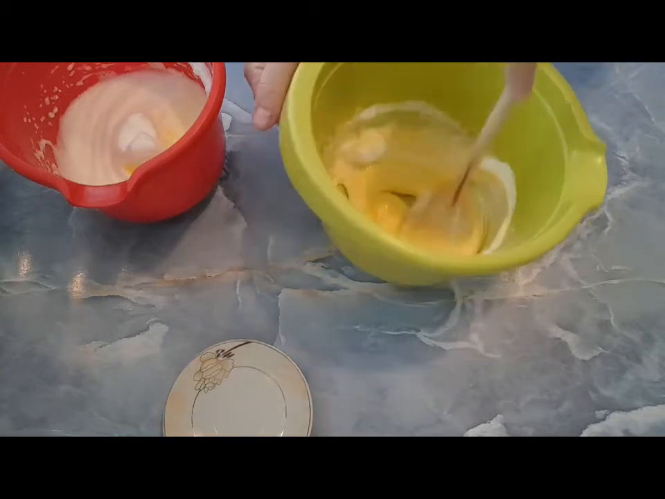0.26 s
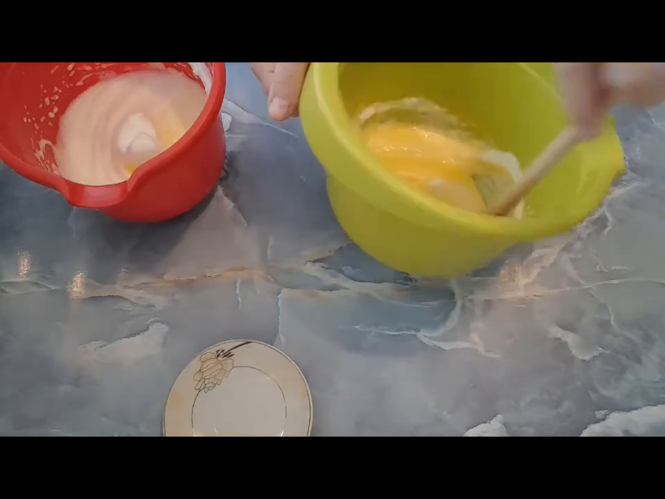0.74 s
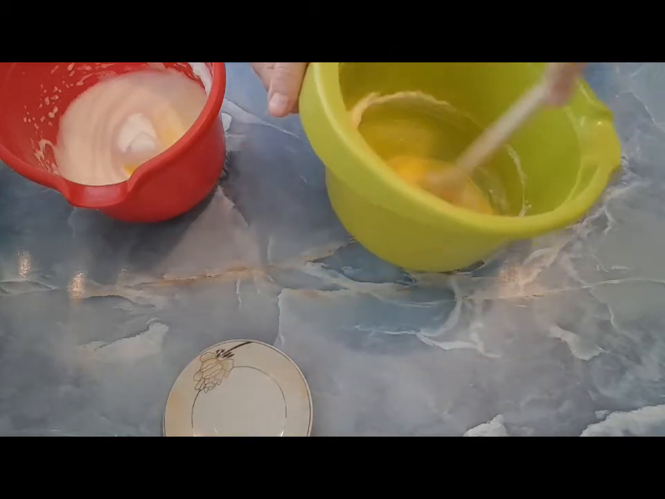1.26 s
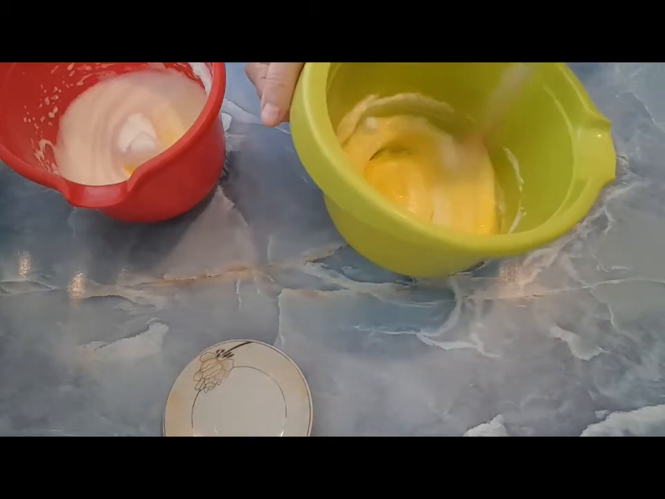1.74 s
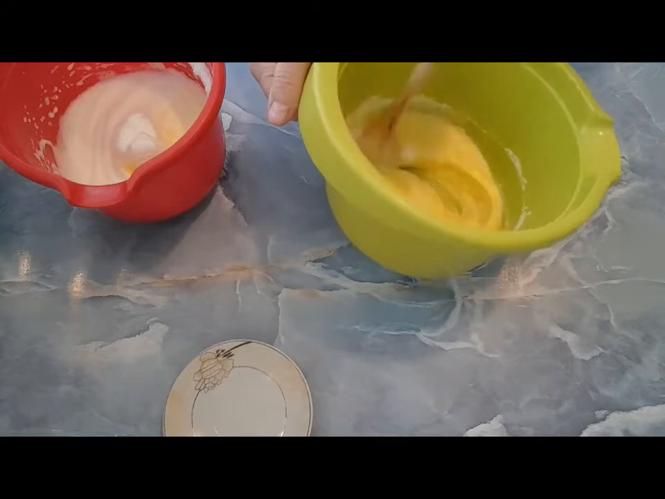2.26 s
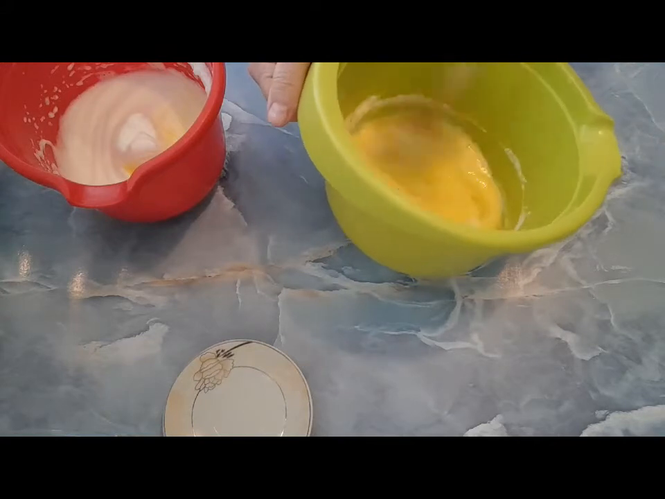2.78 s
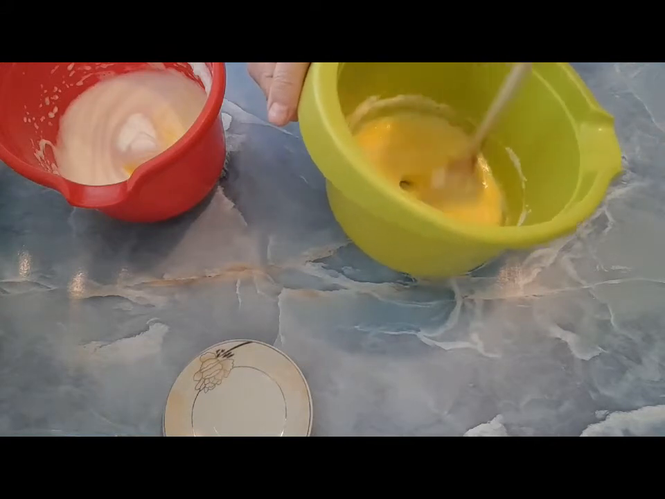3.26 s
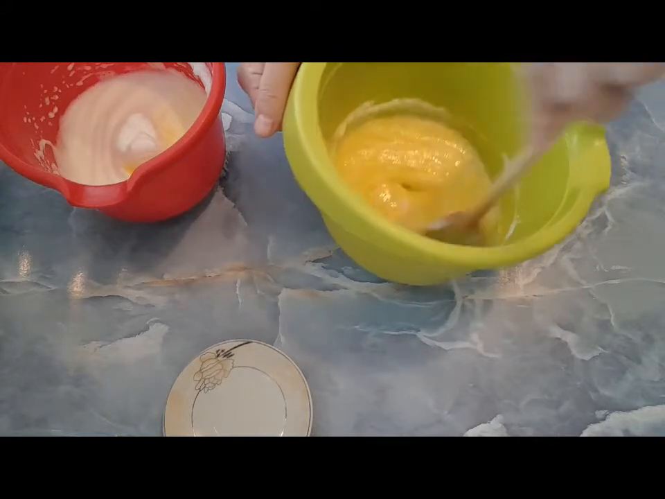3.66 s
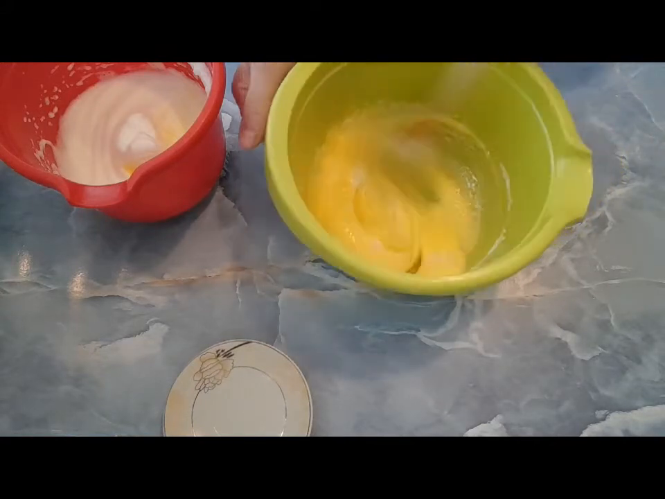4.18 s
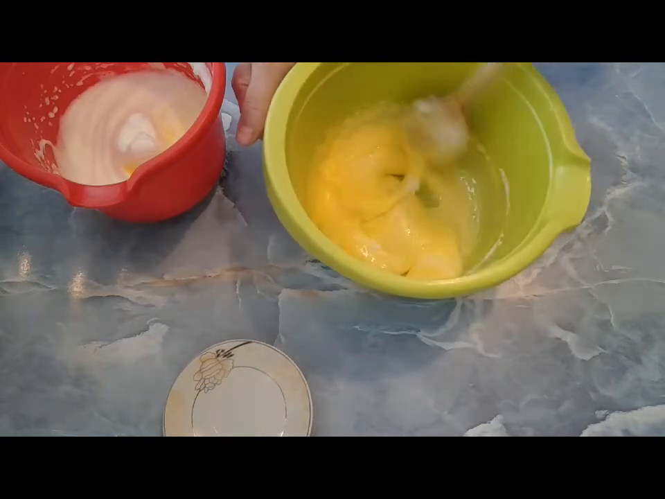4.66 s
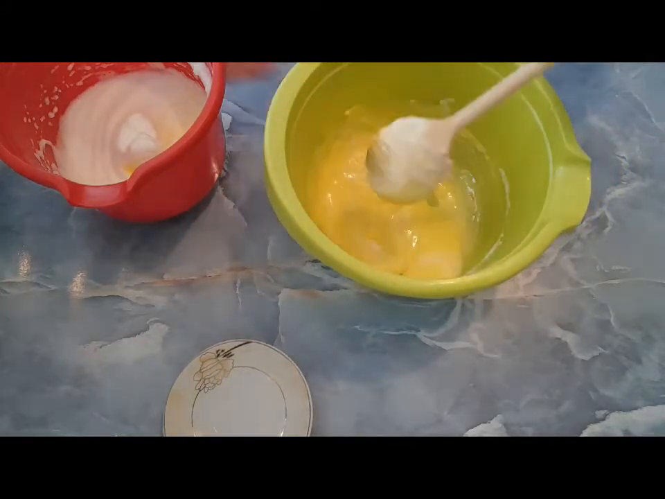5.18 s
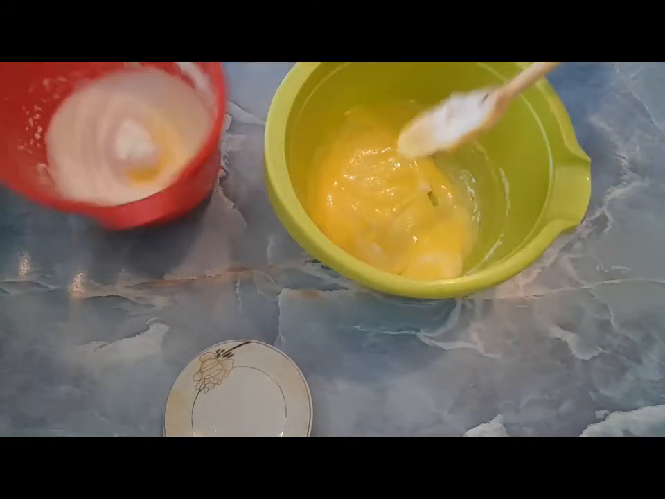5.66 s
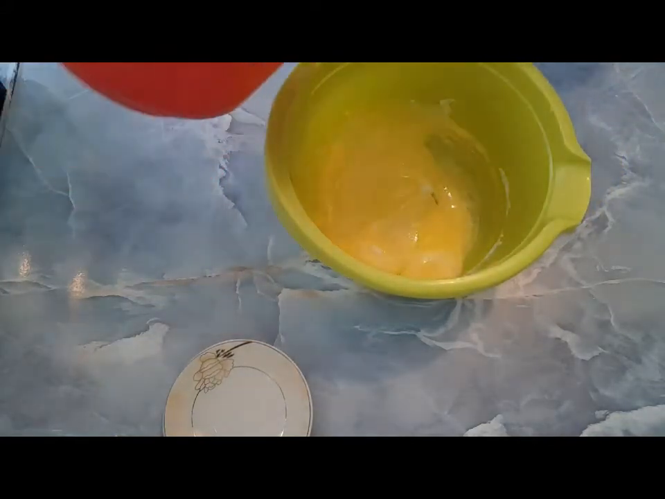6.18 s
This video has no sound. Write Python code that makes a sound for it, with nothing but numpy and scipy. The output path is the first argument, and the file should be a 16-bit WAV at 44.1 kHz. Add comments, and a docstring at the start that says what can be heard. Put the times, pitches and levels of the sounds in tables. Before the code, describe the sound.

From the very start to about 4.3 s, a wooden spoon briskly stirs thick yolk and sugar in a plastic bowl, close to a stereo microphone in a fairly dry kitchen. Strokes come quickly and unevenly, several per second: gritty, fizzy scrapes, small wet smacks and sharp woody ticks on the wall, with hollow plastic knocks ringing briefly in the low mids. The table beneath adds soft booms. Knocks grow somewhat stronger between 2 and 3.3 s, with a prominent one near 3.2 s. Stirring halts at about 4.3 s. A faint rustle follows, then light spoon touches from 4.65 to 4.85 s and a slight shift on the table. Around 5.4 s a dull, heavier thud sounds as a bowl moves, with a weaker bump at 5.6 s. Barely audible rustles remain in near silence until one last light tap at 6.3 s.

```python
"""At a kitchen table, a small stereo microphone stands close by in faint room hush.
First a wooden spoon stirs thick yolk and sugar round a plastic bowl: slips of noise scrape, bursts tick on the
wall, damped sines ring the bowl hollow near 550 Hz and boom the table top. After 4.3 s the stirring stops:
soft noise puffs rustle and quiet touches follow; from 4.9 to 5.7 s bowl and jug shift with thuds on the table.
A last light tap comes at 6.3 s. An expander sinks the quiet gaps."""
import sys
import numpy as np
from scipy import signal
from scipy.fft import rfft, irfft, next_fast_len
from scipy.io import wavfile
from scipy.ndimage import uniform_filter1d

SR = 44100
rng = np.random.default_rng(int(sys.argv[2]) if len(sys.argv) > 2 else 0)


def pcm_store(signal):
    """Save signal as 16-bit PCM."""
    levels = np.round(np.clip(np.atleast_2d(signal), -1, 1) * 32767)
    wavfile.write(sys.argv[1], SR, levels.astype(np.int16).T)


N = 283563
T = np.arange(N) / SR
CREST_DB = 9  # nominal peak of a tick or rustle over its rms


def gain_of(db):
    """Decibels to amplitude."""
    return 10 ** (np.asarray(db) / 20)


def evened(x):
    """Scales to rms 1."""
    return x / np.sqrt(np.mean(x ** 2) + 1e-20)


def colour(x, points, share=1):
    """Filters by a (f/Hz, level/dB) spectrum, or by a share of its decibels."""
    size = next_fast_len(N + SR // 4)
    hz, db = np.transpose(points)
    shape_db = np.interp(np.log(np.fft.rfftfreq(size, 1 / SR) + 1), np.log(hz + 1), db)
    return irfft(rfft(x, size) * gain_of(share * shape_db), size)[..., :N]


def toned(x, noise, points):
    """Colours x, scaled so that the given noise would come out at rms 1."""
    return colour(x, points) / np.std(colour(noise, points))


def wander(per_s):
    """Slow chance drift between -1.6 and 1.6, with so many turning points a second."""
    knots = np.clip(rng.standard_normal(400), -1.6, 1.6)
    return np.interp(T * per_s, np.arange(400), knots)


def grit(per_s, spread_db):
    """Slips of spoon and sugar grains: clicks of uneven size and random sign, scaled to rms 1."""
    size_db = spread_db * np.minimum(rng.exponential(1, N), 5)
    clicks = gain_of(size_db) * rng.choice([-1., 1.], N)
    return evened(clicks * (rng.random(N) < per_s / SR))


def ringing(modes, rise_cycles):
    """One dying sine for every mode, as rows; a soft contact lets it swell over the first cycles."""
    t = T[:SR // 2]
    rings = []
    for hz, db, t60 in modes:
        swell = 1 - np.exp(-t * hz / rise_cycles)
        rings.append(gain_of(db - 60 * t / t60) * np.sin(2 * np.pi * hz * t) * swell)
    return np.array(rings)


def flares(seconds, peaks_db, t60, rise_s):
    """Power envelope of quick rises and dying tails."""
    power = np.zeros(N)
    for s, db in zip(seconds, peaks_db):
        part = power[round(s * SR):][:SR // 2]
        t = T[:len(part)]
        part += (gain_of(db - 60 * t / t60) * np.minimum(t / rise_s, 1)) ** 2
    return power


def stroked(rows, levels_db, lift_db_per_s, rest_db):
    """Level in dB of all strokes together: each bites, eases off while it lasts, then lifts."""
    bite_db_per_s, ease_db_per_s = 599.5, 8.5
    power = np.full(N, gain_of(rest_db) ** 2)
    for (start, length, *_), db in zip(rows, levels_db):
        t = T - start
        bite = bite_db_per_s * np.maximum(-t, 0)
        ease = ease_db_per_s * np.clip(t, 0, length)
        lift = lift_db_per_s * np.maximum(t - length, 0)
        power += gain_of(np.maximum(db - bite - ease - lift, -150)) ** 2
    return 10 * np.log10(power)


def lumpy(x, patchy_db):
    """Time-frequency patches drift in level, alike in every row of x."""
    z = signal.stft(x, nperseg=256, noverlap=192)[2]
    patches = uniform_filter1d(rng.standard_normal(z.shape[1:]), 3, 0)
    patches = evened(uniform_filter1d(patches, 14, 1))
    return signal.istft(z * gain_of(patchy_db * patches), nperseg=256, noverlap=192)[1][:, :N]


def body(modes, rub, blows, held_s, rings_on):
    """Rubbing drives every mode unevenly as the spoon travels; each blow strikes another spot, soon damped."""
    rings = ringing(modes, 1.1)
    rings = rings * (-1.) ** np.arange(len(modes))[:, None]  # neighbouring modes push opposite ways
    pivot_hz = modes[len(modes) // 3][0]
    octaves = np.minimum(np.log2(np.array(modes)[:, 0] / pivot_hz), .5)
    spots_db = 1.7 * rng.standard_normal((len(blows), len(modes))) + np.outer(blows[:, 2], octaves)
    # what struck stays in touch: most of the ring dies early, a share rings on
    struck = gain_of(spots_db) @ rings * (rings_on + np.exp(-T[:SR // 2] / held_s))
    out = np.zeros(N + SR)
    for (s, db, _), ring in zip(blows, struck):
        out[round(s * SR):][:len(ring)] += gain_of(db) * ring / abs(ring).max()
    drive = grit(450, 2.8) * rub / np.linalg.norm(rings)
    for ring in rings:
        out[:N] += signal.oaconvolve(drive * gain_of(3.2 * wander(18)), ring)[:N]
    return out[:N]


def reflections(x, t60, count):
    """A short spray of dying echoes, together of energy 1, lasting count samples."""
    tail = rng.standard_normal(count) * gain_of(-60 * T[:count] / t60)
    return signal.oaconvolve(x, tail / np.linalg.norm(tail))[:N]


# spectrum of the room hush: [f/Hz, density/dB per Hz, relative]
HUSH_SPECTRUM = [(40, -24.5), (161, -7), (252, -18.5), (616, -25), (1250, -33), (6500, -27.5),
                 (8400, -39.5), (9800, -23.5), (13500, -31.5), (15200, -42)]


def room_hush():
    """Steady coloured noise, independent on left and right."""
    return gain_of(-67.5) * evened(colour(rng.standard_normal((2, N)), HUSH_SPECTRUM))


# strokes of the spoon along the wall: [start t/s, length t/s, scrape level/dB,
# fizz level relative to scrape/dB, bowl ring level/dB]
SPOON_STROKES = [(0, 0.093, -49.5, 10, -39.5), (0.106, 0.091, -38, -0.5, -37.5),
                 (0.246, 0.078, -44, -1.5, -39), (0.319, 0.15, -43, 3, -30.5), (0.558, 0.083, -39, -4, -41),
                 (0.696, 0.3, -55, 2, -68), (0.826, 0.061, -48.5, -3, -49.5), (0.928, 0.092, -37, -1, -29),
                 (1.007, 0.071, -42.5, 9, -31.5), (1.114, 0.19, -42, -2.5, -39.5),
                 (1.334, 0.049, -49, 0.5, -41), (1.394, 0.039, -31, -6.5, -25.5),
                 (1.477, 0.23, -40.5, 0.5, -32), (1.757, 0.1, -42.5, 3, -40), (1.9, 0.099, -39, 3, -33.5),
                 (2.052, 0.11, -39, -1, -33), (2.165, 0.19, -39, 0.5, -33), (2.434, 0.18, -45.5, 2, -34.5),
                 (2.564, 0.27, -44, -7.5, -39), (2.723, 0.063, -47, 6.5, -35),
                 (2.838, 0.069, -37.5, -3, -37.5), (2.971, 0.22, -45, 2, -39), (3.241, 0.062, -43, -1, -28),
                 (3.385, 0.11, -53.5, 5, -32.5), (3.538, 0.11, -41.5, 4, -40),
                 (3.677, 0.11, -48.5, 4.5, -51), (3.799, 0.1, -41, 4, -29), (3.935, 0.21, -39.5, -1, -34.5),
                 (4.663, 0.072, -77, 10.5, -60), (4.794, 0.045, -51, 6.5, -52),
                 (4.899, 0.066, -67.5, 6.5, -63), (5.351, 0.16, -78, 11, -67),
                 (6.347, 0.055, -55.5, -7.5, -51.5)]


def stroke_levels():
    """Scrape, fizz and bowl levels in dB, all following the same strokes."""
    scrape, fizz, press = np.transpose(SPOON_STROKES)[2:]
    return [stroked(SPOON_STROKES, db, 350.5, -110) for db in (scrape, scrape + fizz, press)]


# sharp ticks of the spoon on the wall: [t/s, level/dB, fizz level relative to tick/dB, pitch f/Hz]
SPOON_TICKS = [(0.152, -14, -14, 2780), (0.170, -26.5, -16.5, 1620), (0.296, -25, -4.5, 1490),
               (0.338, -14.5, -15, 1490), (0.377, -15.5, -21.5, 2020), (0.4356, -18.5, -8, 2590),
               (0.4757, -23, -4.5, 1610), (0.538, -32, 0.5, 1490), (0.633, -20, -14, 1430),
               (0.847, -22.5, -24.5, 1530), (0.942, -16.5, -26.5, 1500), (1.022, -17, -8.5, 2200),
               (1.050, -21, 0.5, 4460), (1.288, -18.5, -24.5, 1470), (1.3806, -20, -25, 1460),
               (1.436, -11.5, -26, 2520), (1.482, -14.5, -21, 2530), (1.539, -22, -7, 2700),
               (1.796, -16, -27, 1770), (1.871, -18, -5, 2780), (2.0726, -16.5, -11, 2100),
               (2.1094, -16, -12, 1490), (2.200, -15, -10.5, 2640), (2.287, -12, -31.5, 2050),
               (2.424, -18, -31, 1670), (2.744, -17, -29.5, 1490), (2.9822, -14, -14.5, 1480),
               (3.162, -20, -4, 1360), (3.267, -13, -14, 1520), (3.355, -20.5, -7.5, 2050),
               (3.582, -11.5, -16, 2760), (3.654, -20.5, -31, 1520), (3.807, -18, -19, 2730),
               (3.828, -11.5, -29.5, 1730), (3.897, -15, -11.5, 2800), (4.0646, -17.5, -12.5, 2950),
               (4.127, -17, -11.5, 1460), (4.163, -26.5, -3.5, 1470), (4.318, -40.5, -37.5, 1920),
               (4.651, -43, -3.5, 1560), (4.7214, -44, -12.5, 3510), (4.760, -40, -24, 3000),
               (4.782, -35, -1.5, 4760), (4.843, -29, 2, 1770), (6.308, -42.5, -12.5, 2190)]


def spoon_contact():
    """Gain of the rubbing contact: it chatters, and sticks before a tick."""
    at = np.transpose(SPOON_TICKS)[0]
    ahead_s = np.append(at, np.inf)[np.searchsorted(at, T)] - T
    return (1 - 0.21 * np.exp(-ahead_s / 0.019)) * gain_of(2.0 * wander(45))


def spoon_drive(scrape_db, fizz_db, contact, snaps):
    """Slips of the strokes plus noise bursts of the ticks: a coarse push and a fine one, two rows each."""
    at, tick_db, tick_fizz_db, _ = np.transpose(SPOON_TICKS)
    tick_t60 = .028  # s
    crackle = uniform_filter1d(abs(grit(220, 1.1)), 60)  # sugar lumps crush in short bursts
    slips = np.array([grit(9000, 1.4), grit(15000, 3.7)])
    slips = evened(slips * (1 + .7 * crackle)) * contact
    spike = flares(at, tick_db - CREST_DB + 0.5, 0.005, 0.00013)  # the first contact of a tick
    tick = flares(at, tick_db - CREST_DB, tick_t60, 0.00024)
    tick_fizz = flares(at, tick_db + tick_fizz_db, 1.5 * tick_t60, 0.0015)
    push = slips * gain_of(scrape_db) + snaps * np.sqrt(tick + spike)
    fine = slips * gain_of(fizz_db) + snaps * np.sqrt(tick_fizz)
    return push, fine


# spectrum of wood scraping on plastic: [f/Hz, density/dB per Hz, relative]
SCRAPE_SPECTRUM = [(530, -16), (900, -2), (1150, -37.5), (1510, 8.5), (2250, -2), (2650, 2.5), (3460, -3),
                   (7000, -19), (9100, -34), (15400, -120)]


def scraping(push, snaps):
    """The coarse push as broad coloured noise."""
    return toned(push, snaps, SCRAPE_SPECTRUM)


# modes of the bowl wall: [f/Hz, level/dB, t60 t/s]
WALL_MODES = [(1490, 9, 0.082), (2254, 3.8, 0.017), (2640, 3, 0.011), (3230, 4, 0.015)]


def wall_ring(push):
    """The coarse push excites short wall modes, each wandering in level as the spoon travels."""
    rings = ringing(WALL_MODES, 0.64)[:, :3000]
    wall = np.zeros((2, N))
    for ring in rings:
        drive = push * gain_of(3.5 * wander(16))
        wall += signal.oaconvolve(drive, ring[None], axes=1)[:, :N]
    return gain_of(-8.0) * wall / np.linalg.norm(rings)


# spectrum of the fine fizz: [f/Hz, level/dB, relative]
FIZZ_SPECTRUM = [(4500, -4), (8000, -6.5), (8600, -16), (9300, -3), (10500, -4.5), (15000, -8.5),
                 (16000, -30)]


def fizzing(fine, snaps):
    """The fine push as bright coloured noise."""
    return toned(fine, snaps, FIZZ_SPECTRUM)


def smacks():
    """Wet batter lets go of the spoon: short blips at twelve pitches, each sliding upward."""
    per_s, cycles = 110, 4.6
    out = np.zeros((2, N))
    for hz in np.geomspace(1350, 5380, num=12):
        u = np.arange(0, 1, hz / cycles / SR)  # progress through the blip
        blip = np.sin(np.pi * u ** 1.4) ** 2 * np.sin(2 * np.pi * cycles * u * (1 + 0.07 * u))
        train = signal.oaconvolve(grit(per_s / 12, 3.5), blip / np.linalg.norm(blip))[:N]
        out += np.outer(rng.uniform(.3, 1, 2), train)
    return evened(out)


def pings():
    """Each tick rings one spot of the wall at its own pitch, falling 60 dB in 56 cycles."""
    out, t = np.zeros(N), T[:2000]
    for s, db, _, hz in SPOON_TICKS:
        out[round(s * SR):][:2000] += gain_of(db - 6 - 60 * t * hz / 56) * np.sin(2 * np.pi * hz * t)
    return out


def spoon_treble(scrape_db, fizz_db, contact):
    """Scrape, wall, fizz, wet smacks and pings, in two unlike rows: shared and one-sided."""
    snaps = rng.standard_normal((2, N))
    push, fine = spoon_drive(scrape_db, fizz_db, contact, snaps)
    rubbed = scraping(push, snaps) + wall_ring(push) + fizzing(fine, snaps)
    # wet batter colours the rubbing in drifting patches
    return lumpy(rubbed, 3.3) + smacks() * gain_of(scrape_db - 2.5) + pings()


# modes of the hollow bowl: [f/Hz, level/dB, t60 t/s]
BOWL_MODES = [(430, -8.5, 0.062), (521.6, -10.5, 0.041), (554.1, 7, 0.11), (604, -1.5, 0.08),
              (644.5, 1.5, 0.048), (733, -3.5, 0.04), (894, -13.5, 0.036), (1014, -15.5, 0.032),
              (1400, -11, 0.019)]
# hollow knocks on the bowl: [t/s, level/dB, hardness/dB per octave]
BOWL_KNOCKS = [(0.174, -19.5, -24.5), (0.339, -18.5, 14.5), (0.38, -22, 3.5), (0.415, -25, 0.5),
               (0.461, -20.5, 0.5), (0.541, -20, 6.5), (0.645, -26, -9.5), (1.026, -21.5, -1),
               (1.039, -21.5, 0.5), (1.134, -25, 7.5), (1.19, -19, -7), (1.266, -18, 10.5),
               (1.287, -15.5, 3.5), (1.332, -22, 8.5), (1.413, -25.5, 4.5), (1.704, -18, 12),
               (1.872, -17, -17), (1.93, -15, -5), (2.011, -15, -12.5), (2.138, -14.5, 19),
               (2.203, -13, 1.5), (2.527, -28, 5.5), (2.553, -21.5, 18), (2.744, -16.5, 21),
               (2.888, -12.5, 11.5), (2.899, -20, 22.5), (2.982, -17.5, 27), (3.165, -10, 14),
               (3.225, -23.5, 1.5), (3.266, -24.5, 22.5), (3.307, -25, 15.5), (3.455, -17, -13),
               (3.585, -23.5, 0), (3.767, -21, 1.5), (3.876, -20, -19.5), (3.984, -22.5, -1.5),
               (4.022, -14.5, -14.5), (4.06, -18.5, -6), (4.127, -20.5, -8.5), (4.165, -22, -20),
               (4.319, -26.5, 2.5), (4.843, -33, -1), (5.336, -55.5, 2), (5.411, -34.5, 12),
               (5.594, -48.5, -2), (6.309, -32.5, 7.5)]


def plastic_bowl(bowl_db, contact):
    """Rubbed and knocked modes; the squeezed, batter-loaded wall drifts in pitch."""
    bowl = body(BOWL_MODES, gain_of(bowl_db) * contact, np.array(BOWL_KNOCKS), 0.024, 0.4)
    bend_s = .0007 * uniform_filter1d(wander(20), size=900)
    return np.interp(T + bend_s, T, bowl)


# modes of the table top: [f/Hz, level/dB, t60 t/s]
TABLE_MODES = [(114.7, -2, 0.43), (160.6, -1, 0.33), (214, 0, 0.13), (238.6, 1.5, 0.086),
               (289.5, -0.5, 0.11), (345.1, -8.5, 0.21)]
# thuds of bowl and jug on the table: [t/s, level/dB, hardness/dB per octave]
TABLE_THUDS = [(0.337, -22.5, -2.5), (0.851, -34, -11.5), (0.931, -26.5, -0.5), (1.293, -23.5, -5.5),
               (1.401, -26, -0.5), (2.194, -18.5, 7), (2.426, -30.5, -22), (2.883, -23.5, 1),
               (3.163, -24.5, 1.5), (3.266, -26.5, 5), (3.763, -25.5, 11.5), (3.784, -21.5, 9.5),
               (3.897, -31.5, 12), (3.985, -28, -2.5), (4.32, -22, -3), (4.346, -33.5, -7.5),
               (5.342, -44.5, 9.5), (5.387, -32.5, 2), (5.413, -17, 7), (5.598, -32, 0.5),
               (6.313, -32.5, 10.5)]
# modes of the whole table rocking: [f/Hz, level/dB, t60 t/s]
ROCKING_MODES = [(44.5, -1, 0.11), (53.7, -0.5, 0.46)]
# bowl and jug shifting on the table top: [start t/s, length t/s, level/dB]
TABLE_SHIFTS = [(4.855, 0.13, -54.5), (5.357, 0.047, -57.5), (5.394, 0.039, -45), (5.594, 0.071, -66)]


def table_top():
    """The table takes a share of the press on the bowl, booms under thuds and shifts, and rocks slowly."""
    press_db = np.transpose(SPOON_STROKES)[4] - 5.5
    shift_db = np.transpose(TABLE_SHIFTS)[2]
    table_db = stroked(SPOON_STROKES + TABLE_SHIFTS, [*press_db, *shift_db], 158, -75.5)
    table = body(TABLE_MODES, gain_of(table_db), np.array(TABLE_THUDS), 0.18, 0.6)
    rocking_db = 0.56 * uniform_filter1d(table_db, 6000) - 27.0  # heavy, so slow to follow
    rock = ringing(ROCKING_MODES, 0.76).sum(0)
    rocking = gain_of(rocking_db) * rng.standard_normal(N)
    return table + signal.oaconvolve(rocking, rock / np.linalg.norm(rock))[:N]


# faint soft rustles in the pauses: [t/s, level/dB, streak pitch f/Hz]
PAUSE_RUSTLES = [(4.411, -53, 4570), (5.215, -53, 2850), (5.405, -49.5, 2570), (5.478, -45.5, 2200),
                 (5.5964, -61, 3020), (5.7524, -54.5, 1050), (6.014, -56, 2204), (6.282, -54.5, 2960)]
# spectrum of their hiss: [f/Hz, density/dB per Hz, relative]
RUSTLE_SPECTRUM = [(880, -31), (1500, -33), (2110, -26), (2900, -15.5), (3430, -13), (8000, -22),
                   (17600, -120)]


def rustles():
    """Brief puffs of patchy hiss, each with one fuzzy narrow streak: a sine under slow noise."""
    at, db, hz = np.transpose(PAUSE_RUSTLES)
    hiss = evened(lumpy(colour(rng.standard_normal((2, N)), RUSTLE_SPECTRUM), 1.0))
    pitch = hz[np.maximum(np.searchsorted(at, T) - 1, 0)]
    waver = uniform_filter1d(rng.standard_normal((2, N)), round(.009 * SR))  # 9 ms average
    streak = evened(waver * np.sin(2 * np.pi * pitch * T))
    return (hiss + gain_of(-8) * streak) * np.sqrt(flares(at, db - CREST_DB, .28, 0.00082))


# filter on the one-sided sound: [f/Hz, level/dB]
SIDE_FILTER = [(60, -15), (180, -15), (550, -9), (1650, -4), (4970, -1), (15000, 0)]
# filter difference, left minus right: [f/Hz, level/dB]
LEFT_LEAN = [(60, -2.5), (300, 1), (950, -2.5), (2380, -4.5), (5500, -6.5), (8000, -0.5), (13000, 2.5)]


def scene():
    """The kitchen answers briefly; the two ports agree in the bass and differ in the treble."""
    hush = room_hush()
    scrape_db, fizz_db, bowl_db = stroke_levels()
    contact = spoon_contact()
    treble = spoon_treble(scrape_db, fizz_db, contact) + rustles()
    low = plastic_bowl(bowl_db, contact) + table_top()
    mid = treble[0] + gain_of(-8.5) * reflections(treble[0], 0.22, count=12000)
    mid += low + gain_of(-4.5) * reflections(low, 0.29, count=14000)
    side = colour(treble[1] + gain_of(2) * reflections(low, 0.087, count=16000), SIDE_FILTER)
    left = colour(mid + side, LEFT_LEAN, .5)
    right = colour(mid - side, LEFT_LEAN, -.5)
    return np.array([left, right]) + hush


# response of the microphone and its mount: [f/Hz, level/dB]
MIC_RESPONSE = [(22, -42), (40, -7), (55, -1), (78, -11.5), (110, -1)]


def record(dry):
    """Microphone bass cut; an expander lowers whatever falls under its threshold; then the band limit."""
    threshold_db, edge_hz = -62.5, 16300
    heard = colour(dry, MIC_RESPONSE)
    power_db = 10 * np.log10(abs(uniform_filter1d((heard ** 2).mean(0), 600)) + 1e-12)
    under_db = np.clip(threshold_db - power_db, 0, 12)
    quiet = heard / gain_of(1.9 * uniform_filter1d(under_db, 600))  # 1.9 dB down per dB under
    low_pass = signal.firwin(511, edge_hz, window=("kaiser", 9), fs=SR)
    return signal.oaconvolve(quiet, low_pass[None], "same")


dry = scene()
out = record(dry)
pcm_store(out)
```